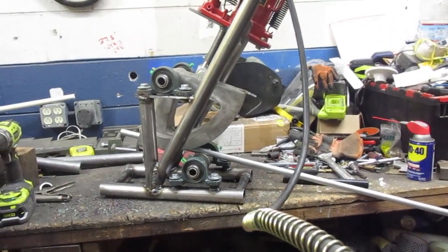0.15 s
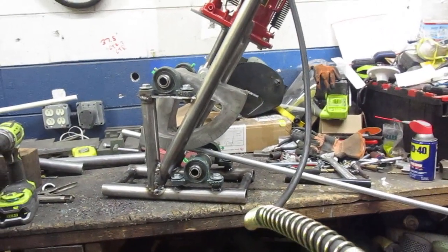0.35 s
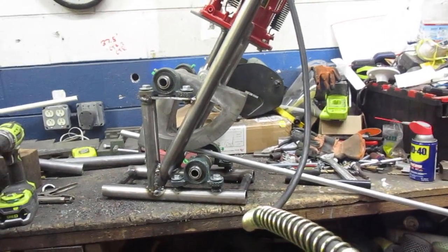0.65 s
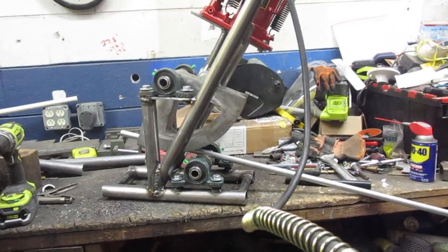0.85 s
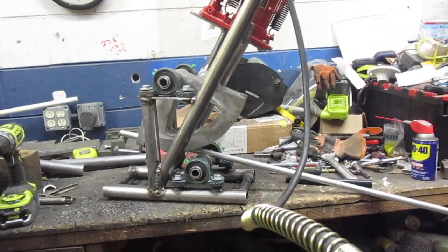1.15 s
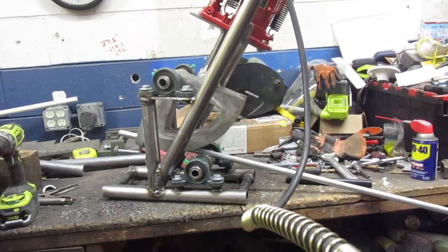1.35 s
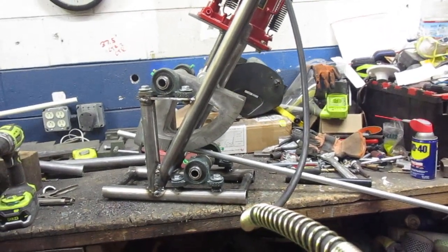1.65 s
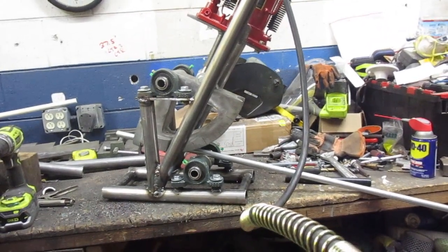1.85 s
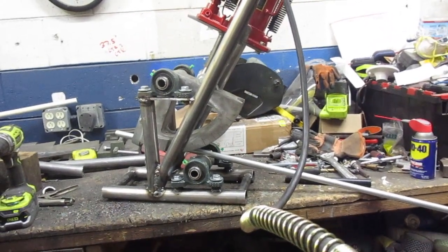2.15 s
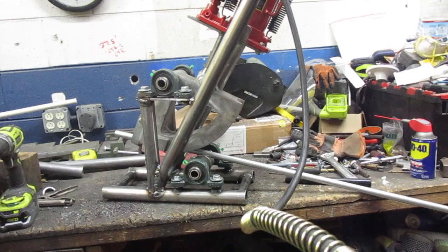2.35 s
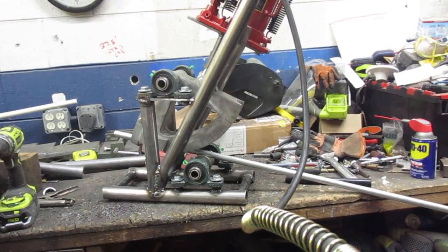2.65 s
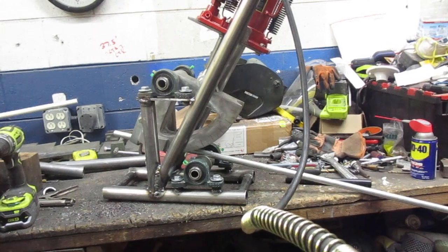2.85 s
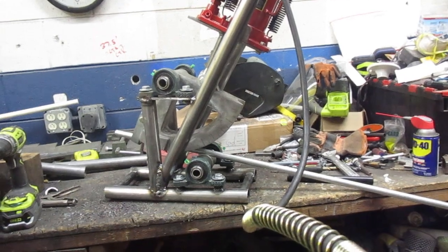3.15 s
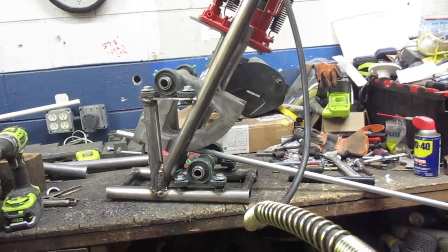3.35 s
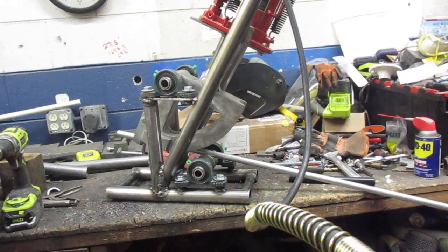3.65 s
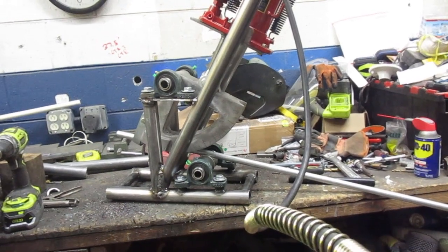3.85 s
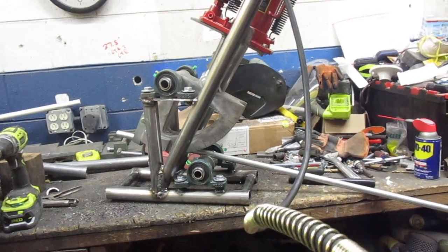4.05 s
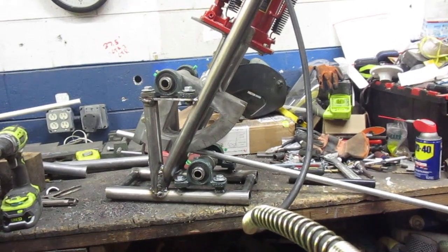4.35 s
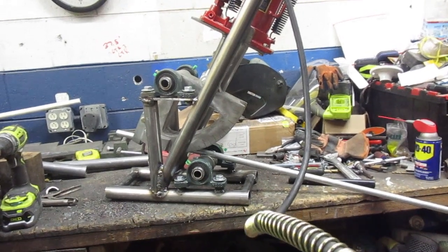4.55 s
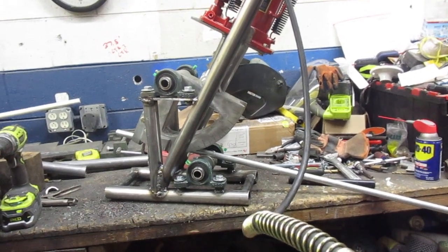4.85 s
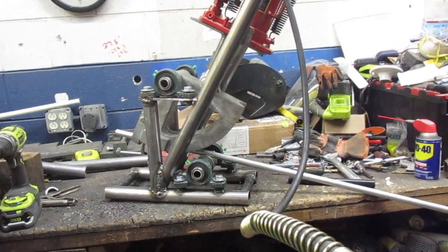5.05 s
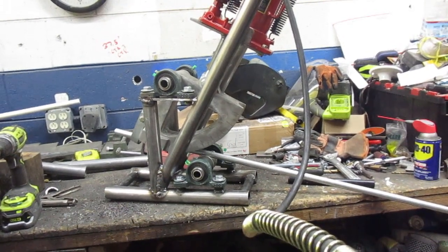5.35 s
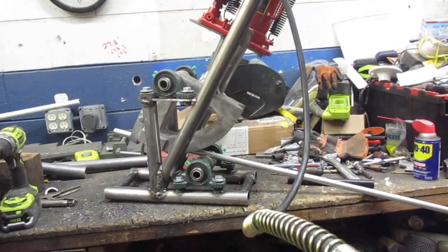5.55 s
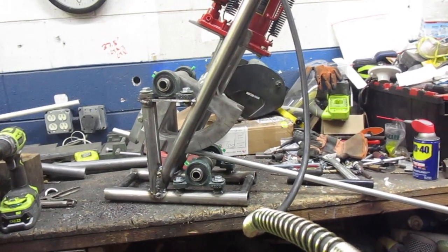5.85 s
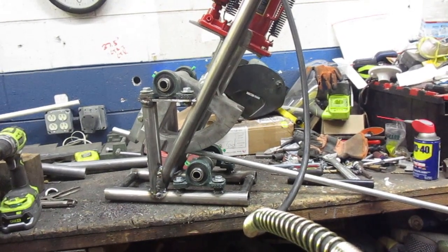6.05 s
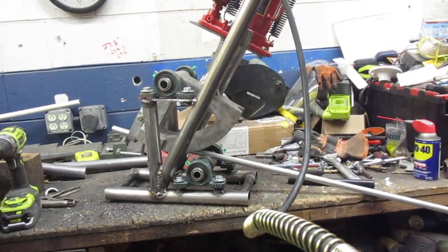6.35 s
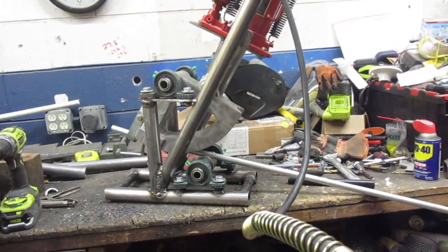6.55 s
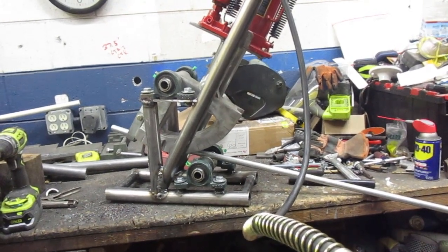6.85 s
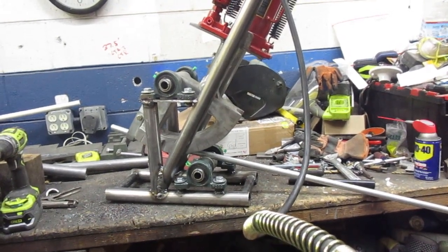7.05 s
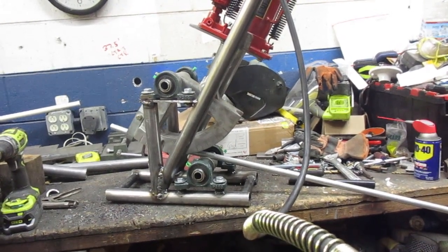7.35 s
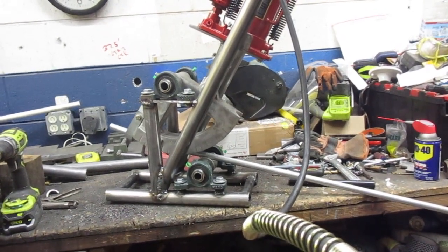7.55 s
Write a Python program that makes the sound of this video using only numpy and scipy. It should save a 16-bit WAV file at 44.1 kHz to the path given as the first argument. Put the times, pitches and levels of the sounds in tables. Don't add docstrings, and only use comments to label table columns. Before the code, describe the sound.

An air-driven hydraulic jack fires harsh, rapid bursts of venting air with metallic valve rattle, pausing briefly once past the middle, in a reverberant workshop.

```python
import sys
import numpy as np
from scipy import signal
from scipy.fft import rfft, irfft
from scipy.io import wavfile
from scipy.ndimage import uniform_filter1d

SR = 44100
rng = np.random.default_rng(int(sys.argv[2]) if len(sys.argv) > 2 else 0)


def ratio_of_db(decibels):
    return 10 ** (np.asarray(decibels, float) / 20)


def file_out(sig):
    cols = np.atleast_2d(sig).T
    lim = np.clip(cols, -1, 1)
    pcm = np.round(lim * 32767).astype(np.int16)
    wavfile.write(sys.argv[1], SR, pcm)


N = 339570
RISE_S, OPEN_S = 0.0031, 0.022

# stroke number, t/s
MOTOR_CLOCK = [(0, .0067), (10, .6572), (20, 1.306), (30, 1.9528), (40, 2.5987), (50, 3.245), (63, 4.0838),
               (64, 4.5083), (65, 4.5748), (70, 4.9), (80, 5.5567), (90, 6.217), (100, 6.8768),
               (112, 7.6658)]
# t/s, jet level/dB
LINE_PRESSURE = [(0, -12.5), (.25, -14.5), (.57, -12.5), (.85, -15), (1.22, -13), (1.4, -14), (1.95, -12.7),
                 (2.6, -15), (3.4, -12.5), (3.65, -14), (3.85, -13.5), (4.08, -15), (4.9, -14.5),
                 (5.38, -12), (5.93, -14.5), (6.4, -12.5), (6.75, -14), (7.33, -11.5)]


def strokes():
    uneven_s, uneven_db = 0.0006, 0.6
    number, clock_s = np.transpose(MOTOR_CLOCK)
    late, strong = rng.standard_normal((int(number[-1]) + 1, 2)).T
    starts = np.interp(np.arange(len(late)), number, clock_s) + uneven_s * late
    strength_db = np.interp(starts, *np.transpose(LINE_PRESSURE)) + uneven_db * strong
    return np.array([starts, strength_db]).T


# f/Hz, level/dB per Hz
JET_SPECTRUM = [(300, -19), (900, -14), (1500, -9.5), (2300, -6), (3600, -7.5), (4900, -3.5), (6500, -0.5),
                (7900, -1.5), (9300, -7.5), (11100, -4.5), (12000, -4), (12700, -13.5), (14000, -8.5),
                (15500, -16)]
# f/Hz, fall while open/(dB/s), fall after closing/(dB/s)
JET_SAG = [(1490, 157, 515), (4460, 321, 616), (9300, 95, 609), (13800, 50, 736)]
OPENING_LAG = [1.4, 0.9, 0.73, 0.74]
# f/Hz, level/dB
TURNED_COLOUR = [(800, 2.5), (2200, 1.5), (4500, 0.5), (7000, -3.5), (9500, -1.5), (11700, -3),
                 (12900, -1.5), (15000, -0.5)]
# t/s, share 0-1
JACK_RISE = [(0, 0.2), (1, 0), (3.9, 0), (4.6, 0), (5.6, 0.7), (6.4, 0.5), (7.2, 0.77), (7.7, 0.8)]


def exhaust(beat, flicker_db=0.5, shade_db=0.18, patchy_db=1.0, wander_db=0.37, surge_db=5, surge_s=0.018):
    wandering = patchy(coloured(JET_SPECTRUM, N), wander_db, bins=9, frames=60)
    jet = rfft(patchy(wandering, patchy_db))
    hz = np.fft.rfftfreq(N, 1 / SR)
    turned_jet = jet * ratio_of_db(read(TURNED_COLOUR, hz))

    starts, strength_db = np.transpose(beat)
    t = np.arange(N) / SR + RISE_S
    stroke = np.maximum(np.searchsorted(starts, t) - 1, 0)
    age = np.maximum(t - starts[stroke], 0)
    open_s, shut_s = np.minimum(age, OPEN_S), np.maximum(age - OPEN_S, 0)
    shade = shade_db * rng.standard_normal((len(beat), len(JET_SAG)))[stroke]
    turned = np.clip(curve(JACK_RISE), 0, 1)
    rested = np.diff(starts, prepend=0)[stroke] > 0.2
    surge = surge_db * rested * np.exp(-age / surge_s)

    out = np.zeros(N)
    for k, (_, open_fall, shut_fall) in enumerate(JET_SAG):
        share = read([(row[0], k == j) for j, row in enumerate(JET_SAG)], hz)
        fall_db = open_fall * open_s + shut_fall * shut_s
        opened = np.clip(age / (2 * RISE_S * OPENING_LAG[k]), 0, 1)
        opening = np.sin(np.pi / 2 * opened) ** 2
        band = (1 - turned) * irfft(jet * share, N) + turned * irfft(turned_jet * share, N)
        out += band * opening * ratio_of_db(shade[:, k] - fall_db)
    turbulence = evened(uniform_filter1d(rng.standard_normal(N), size=90))
    return out * ratio_of_db(strength_db[stroke] + surge + flicker_db * turbulence)


# f/Hz, level/dB, t60/s
VALVE_MODES = [(1744, -30, 0.039), (2630, -34, 0.011), (1210, -38.5, 0.016), (950, -49, 0.06)]
# f/Hz, level/dB, t60/s
FRAME_MODES = [(121.6, -27, 0.22), (193, -34, 0.3), (300, -30, 0.05)]


def knocks(beat, spread_db=0.0, scatter_s=0.011, grit_db=-24):
    loaded_db = 3.5
    thumps, slams = np.zeros((2, N))
    chance = rng.standard_normal((len(beat), 2))
    rattle = rng.standard_normal((len(beat), 600))
    rattle_decay = np.exp(-np.arange(600) / SR / scatter_s)
    for (s, db), (a, b), grit in zip(beat, chance, rattle):
        add(thumps, s, ratio_of_db([db + 6.0 + spread_db * a]))
        blow = ratio_of_db(db + 14.0 + spread_db * b)
        add(slams, s + OPEN_S, np.array([blow]))
        add(slams, s + OPEN_S, blow * ratio_of_db(grit_db) * grit * rattle_decay)
    soft_thumps = uniform_filter1d(thumps, size=90) * 90 / 80
    frame = ratio_of_db(loaded_db * curve(JACK_RISE)) * ring(FRAME_MODES, soft_thumps)
    return frame + ring(VALVE_MODES, slams)


def ring(modes, blows):
    t = np.arange(SR // 3) / SR
    response = sum(ratio_of_db(db - 60 * t / t60) * np.sin(2 * np.pi * hz * t) for hz, db, t60 in modes)
    return signal.oaconvolve(blows, response)[:N]


# t/s, air flow level/dB
TRIGGER = [
    (0, 0),
    (4.115, 0),
    (4.135, -60),
    (4.445, -60),
    (4.462, -14),
    (4.478, -2),
    (4.5, 0),
    (7.7, 0),
]
# f/Hz, level/dB per Hz
INLET_HISS = [(500, -30), (1200, -20), (1800, -14), (2600, -5), (3800, -4), (5000, -2), (7500, -5),
              (10500, -11), (15000, -17)]
# f/Hz, width/Hz, level/dB
INLET_WHISTLES = [
    (4765, 110, -40),
    (4100, 630, -61),
    (2730, 1000, -43),
]


def feed():
    hiss = ratio_of_db(-42) * coloured(INLET_HISS, N)
    tones = np.zeros(N)
    for hz, width_hz, db in INLET_WHISTLES:
        tones += ratio_of_db(db) * evened(resonate(rng.standard_normal(N), hz, width_hz))
    return ratio_of_db(curve(TRIGGER)) * (hiss + tones)


def resonate(x, hz, width_hz):
    turn = np.exp(2j * np.pi * hz * np.arange(len(x)) / SR)
    r = np.exp(-np.pi * width_hz / SR)
    return 2 * (turn * signal.lfilter([1 - r], [1, -r], x / turn)).real


# t/s, length/s, peak level/dB, f/Hz
MIC_GUSTS = [(.015, 0.049, -15.5, 318), (.065, 0.036, -11.5, 300), (.09, 0.023, -14, 224),
             (.131, 0.029, -8.5, 435), (.263, .02, -17.5, 200), (.4025, 0.037, -11, 300),
             (.667, 0.037, -8.5, 390), (.801, 0.0277, -13, 212), (.978, .025, -21, 376),
             (1.32, 0.032, -14.5, 198), (1.44, 0.075, -15.5, 332), (1.65, 0.02, -18, 162),
             (1.862, 0.036, -16.5, 180), (2.069, 0.0097, -13, 199), (2.46, 0.063, -17.5, 300),
             (2.54, 0.0064, -7.5, 288), (2.648, .011, -13, 265), (3.624, 0.013, -10.5, 274),
             (3.725, 0.022, -13.5, 300), (3.81, 0.024, -16, 170), (4.831, 0.0244, -2, 370),
             (4.986, 0.028, -10.5, 300), (5.087, 0.029, -11.5, 343), (5.28, .04, -9.5, 250),
             (5.575, 0.066, -15, 198), (6.789, 0.027, -9, 346), (6.958, 0.04, -12, 238),
             (7.237, 0.024, -11.5, 250), (7.298, 0.026, -10, 316), (7.44, 0.034, -17.5, 222)]
# t/s, peak level/dB, f/Hz
MIC_PUFFS = [(1.514, -36, 205), (1.964, -18, 137), (2.207, -23, 134), (2.844, -22.5, 168),
             (2.898, -18, 178), (3.071, -21, 240), (3.289, -22, 116), (3.475, -15.5, 268),
             (3.51, -17.5, 154), (3.543, -21, 400), (3.939, -19.5, 200), (4.176, -17, 326),
             (4.188, -25, 400), (4.246, -24.5, 308), (4.301, -25.5, 378), (4.32, -29, 328),
             (4.335, -29, 260), (4.406, -36, 140), (4.861, -15, 115), (5.014, -13, 180), (5.381, -19, 422),
             (5.423, -19, 276), (5.644, -18, 300), (5.722, -17.5, 133), (5.871, -18.5, 400),
             (6.096, -14.5, 166), (6.406, -19, 118), (6.615, -15.5, 203), (7.52, -21, 113),
             (7.597, -24, 131)]
# f/Hz, level/dB per Hz
DRAUGHT_RUMBLE = [(20, -9), (50, -2), (90, -0.5), (150, -3), (250, -8.5), (400, -20), (900, -36),
                  (4000, -92)]


def buffets(lumpy_db=3):
    puff_s, puff_swell_db = 0.0132, -3
    swarm_per_s, swarm_db, swarm_spread_db = 136, -5.5, 3.5
    swarm_octaves, sink_octaves = 1, -0.25
    lead = 0.3
    snap_db, snap_ratio = -9, 2.1
    calm_db, swell_db, swell_share, swell_s = -40.5, -22, 0.4, 0.035

    out, t = np.zeros(N), np.arange(N) / SR
    slow_t = t[::64]
    swell_power = ratio_of_db(calm_db) ** 2
    gusts = MIC_GUSTS + [(s, puff_s, db, hz) for s, db, hz in MIC_PUFFS]
    for (s, length_s, db, hz), chance in zip(gusts, rng.random((len(gusts), 16, 4))):
        add(out, *eddy(s, db, hz, chance[0, 0]))
        add(out, *eddy(s, db + snap_db, hz * snap_ratio, chance[0, 1]))
        for k, (phase, when, size, pitch) in enumerate(chance[1:]):
            present = np.clip(swarm_per_s * length_s - k, 1e-6, 1)
            small_s = s + length_s * (when - lead)
            small_db = db + swarm_db + swarm_spread_db * np.log(size)
            small_hz = hz * 2 ** (sink_octaves + swarm_octaves * (2 * pitch - 1))
            start, push = eddy(small_s, small_db, small_hz, phase)
            add(out, start, present * push)
        lift_db = swell_db + swell_share * db + puff_swell_db * (length_s == puff_s)
        spread_s = length_s * lead + swell_s * np.where(slow_t > s, 1, lead)
        swell_power = swell_power + ratio_of_db(lift_db) ** 2 * np.exp(-((slow_t - s) / spread_s) ** 2)

    smooth = uniform_filter1d(rng.standard_normal(N), size=700)
    lumps = evened(uniform_filter1d(smooth, size=700))
    rumble = evened(coloured(DRAUGHT_RUMBLE, N) * ratio_of_db(lumpy_db * lumps))
    return out + np.interp(t, slow_t, np.sqrt(swell_power)) * rumble


def eddy(s, db, hz, phase, turns=0.46):
    u = np.arange(-3 * turns, 3 * turns, hz / SR)
    bell = np.exp(-(u / turns) ** 2)
    swing = bell * np.cos(2 * np.pi * (u + phase))
    return s - 3 * turns / hz, ratio_of_db(db) * (swing - bell * swing.sum() / bell.sum())


# f/Hz, t60/s
SHOP_DECAY = [(300, .95), (1200, .85), (2600, 0.74), (4500, 0.62), (8000, 0.55), (10800, 0.45),
              (14500, 0.42)]


def shop(x):
    taps = np.zeros(SR)
    at = np.arange(300, SR - 20, 20)
    taps[at + rng.integers(0, 20, len(at))] = rng.choice([-1., 1.], len(at))
    hz, t, z = signal.stft(taps, SR, nperseg=256)
    decay = ratio_of_db(-60 * t / read(SHOP_DECAY, hz)[:, None])
    tail = signal.istft(z * decay, SR, nperseg=256)[1]
    return signal.fftconvolve(x, tail / np.linalg.norm(tail))[:N]


# f/Hz, level/dB per Hz
FLOOR_SPECTRUM = [(300, 0), (2000, -6), (7000, -13), (12000, -23), (15000, -28)]


def room_floor():
    return ratio_of_db(-67) * coloured(FLOOR_SPECTRUM, N)


def evened(x):
    return x / np.sqrt(np.mean(x ** 2) + 1e-20)


def read(points, hz, column=1):
    table = np.transpose(points)
    return np.interp(np.log(hz + 1), np.log(table[0] + 1), table[column])


def curve(points):
    return np.interp(np.arange(N) / SR, *np.transpose(points))


def add(mix, s, sound):
    part = mix[max(round(s * SR), 0):][:len(sound)]
    part += sound[:len(part)]


def coloured(points, size):
    gain = ratio_of_db(read(points, np.fft.rfftfreq(size, 1 / SR)))
    return evened(irfft(rfft(rng.standard_normal(size)) * gain, size))


def patchy(x, depth_db, bins=4, frames=5):
    z = signal.stft(x, nperseg=256, noverlap=192)[2]
    field = uniform_filter1d(rng.standard_normal(z.shape), size=bins, axis=0)
    field = uniform_filter1d(field, size=frames, axis=1)
    varied = z * ratio_of_db(depth_db * evened(field))
    return evened(signal.istft(varied, nperseg=256, noverlap=192)[1][:len(x)])


def scene():
    beat = strokes()
    jack = exhaust(beat) + knocks(beat) + feed()
    reverb = ratio_of_db(-8.5) * shop(jack)
    return (jack + reverb + buffets() + room_floor())[None]


# f/Hz, level/dB
BAND_EDGE = [(14950, 0), (15170, -28), (15400, -50), (16000, -85)]


def low_pass(x):
    return signal.sosfilt(signal.butter(12, 16000, fs=SR, output="sos"), x)


def record(dry):
    ceiling = 1.5
    rounded = ceiling * np.tanh(dry / ceiling)
    gain = ratio_of_db(read(BAND_EDGE, np.fft.rfftfreq(N, 1 / SR)))
    limited = irfft(rfft(rounded) * gain, N)
    return low_pass(limited)


dry = scene()
out = record(dry)
file_out(out)
```